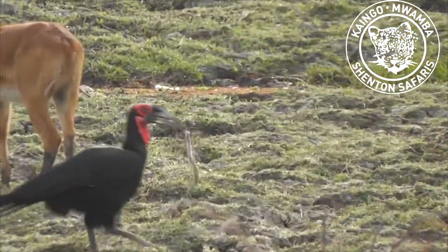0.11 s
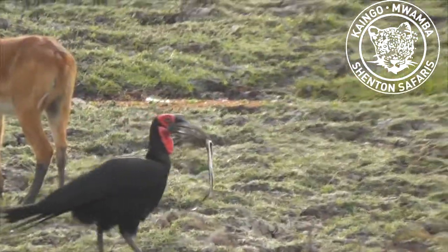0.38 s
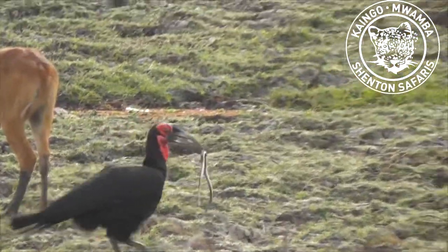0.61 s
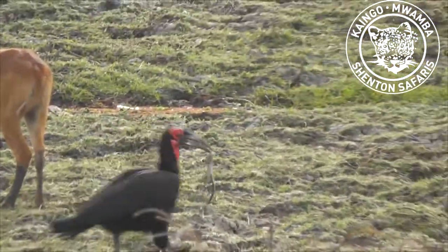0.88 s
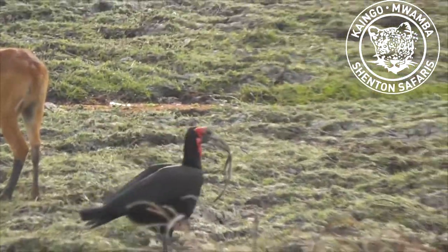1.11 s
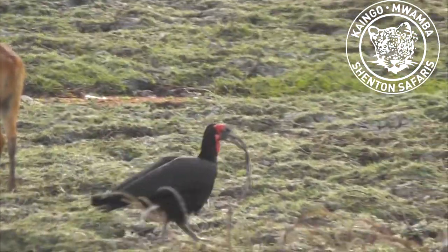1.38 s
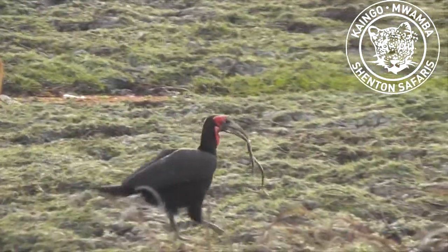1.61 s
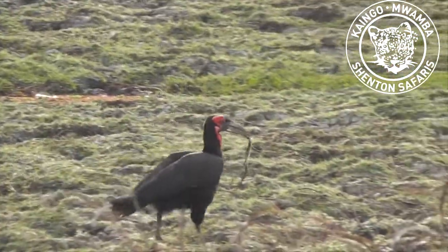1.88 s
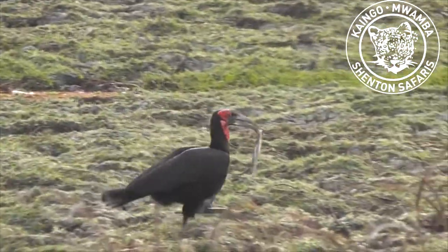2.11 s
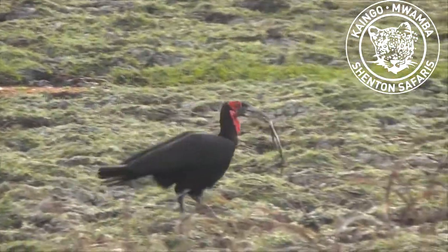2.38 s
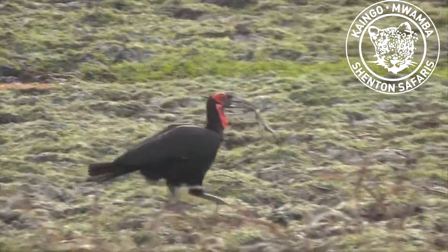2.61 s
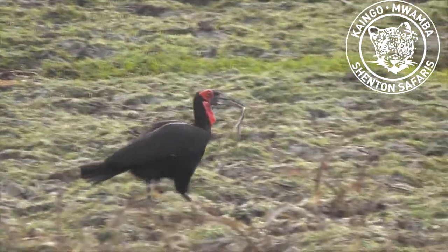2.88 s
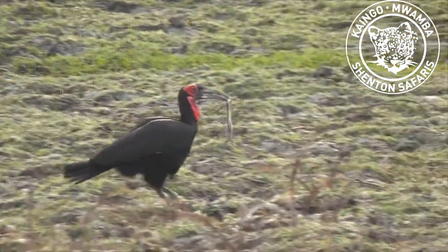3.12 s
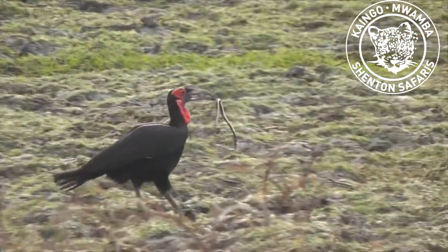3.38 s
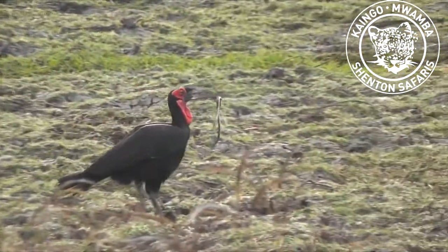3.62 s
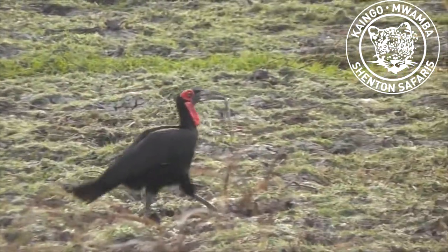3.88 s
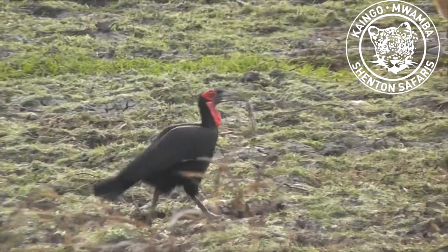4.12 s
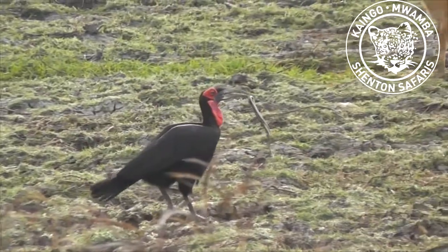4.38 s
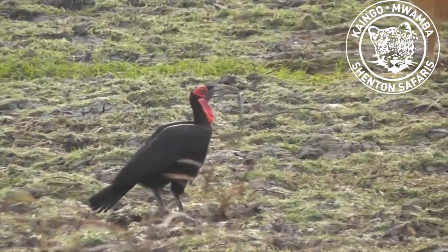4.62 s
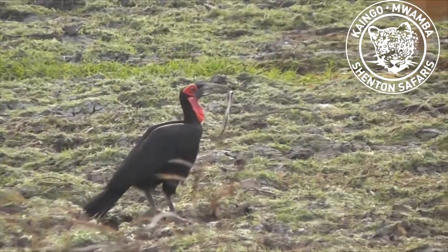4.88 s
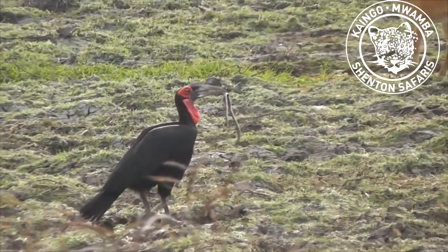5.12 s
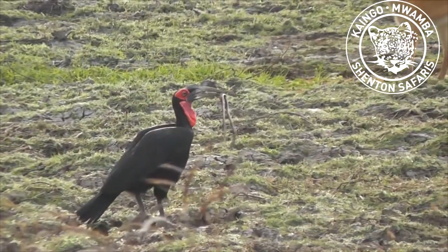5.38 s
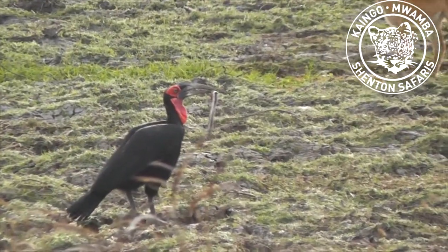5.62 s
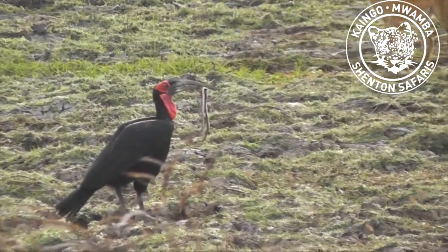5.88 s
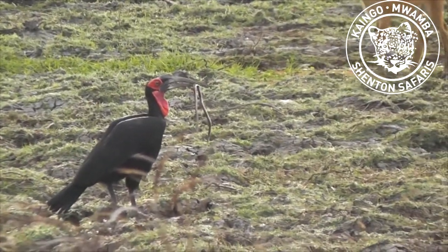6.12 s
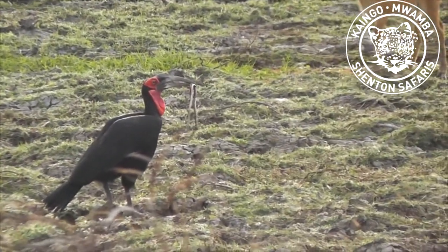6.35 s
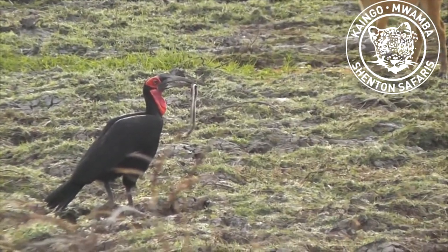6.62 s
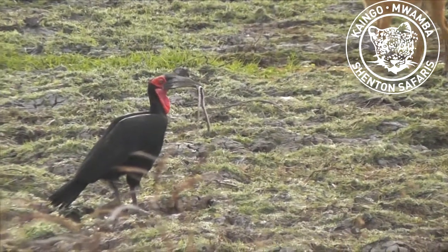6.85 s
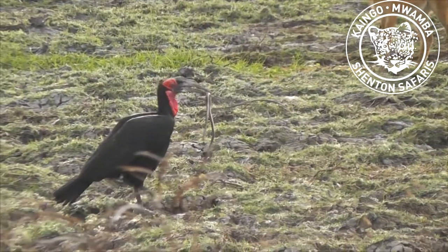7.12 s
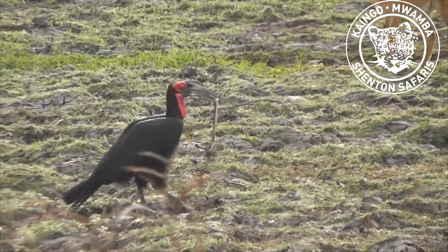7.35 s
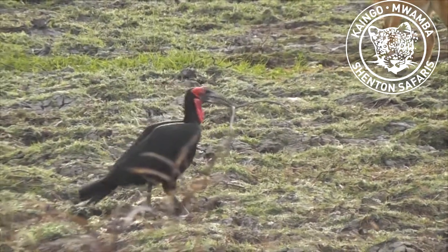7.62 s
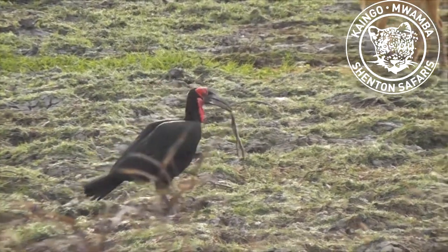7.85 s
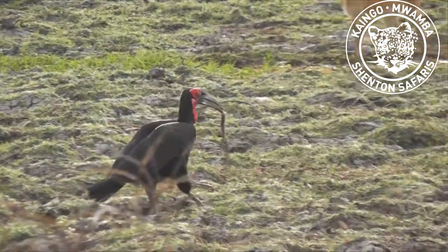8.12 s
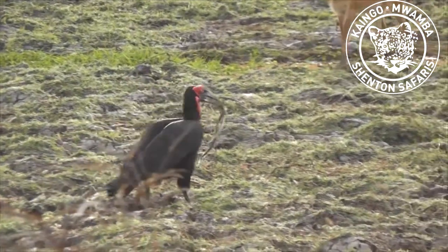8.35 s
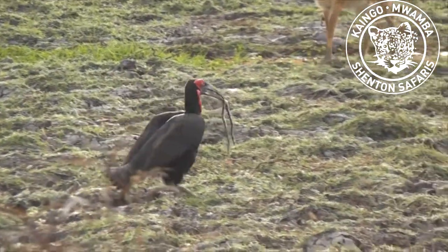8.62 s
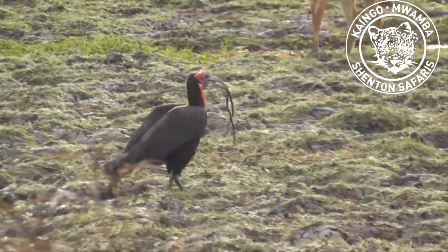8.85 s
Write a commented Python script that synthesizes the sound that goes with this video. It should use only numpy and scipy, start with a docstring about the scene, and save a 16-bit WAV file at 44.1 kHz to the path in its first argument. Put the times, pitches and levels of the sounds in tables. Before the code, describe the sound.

Outdoors in open grassland, wind buffets a small camera's microphones with low thumps and rumble for about three seconds, then nearly stops. A dove repeats short coos and rolling trills throughout, small birds whistle and a distant flock twitters. Insects buzz thinly up high, the lens motor ticks faintly early on, and a few small clicks and dull handling knocks follow. The large walking bird itself is not heard.

```python
"""Gusts of wind thump and rumble on a small camera's pair of microphone ports in open grassland, then die
down. They are shaped noise and bell-shaped bursts. A dove coos and trills and small birds whistle, as
sines on gliding pitches; a far flock is a crowd of short slides. Insects buzz near 6 kHz, as chopped
noise, and a cricket strokes. The camera's motor ticks through ringing modes and hums in faint tones;
knocks and one creak come from its body. Far air and microphone hiss lie beneath."""
import sys
import numpy as np
from scipy import signal
from scipy.fft import rfft, irfft
from scipy.io import wavfile
from scipy.ndimage import uniform_filter1d

SR = 44100
rng = np.random.default_rng(int(sys.argv[2]) if len(sys.argv) > 2 else 0)


def invert_db(level):
    """Linear amplitude ratio for a level in decibels (20 dB per decade), elementwise."""
    return 10 ** (np.asarray(level, dtype=float) / 20)


def pcm_store(signal):
    """Save signal as 16-bit PCM."""
    levels = np.round(np.clip(np.atleast_2d(signal), -1, 1) * 32767)
    wavfile.write(sys.argv[1], SR, levels.astype(np.int16).T)


N = 396459
T = np.arange(N) / SR


def rms_one(x):
    """Normalisation: scales to a root mean square of 1."""
    return x / np.sqrt(np.mean(x ** 2) + 1e-20)


def in_time(rows):
    """Linear interpolation of every column over the time in the first."""
    s, *columns = np.transpose(rows)
    return [np.interp(T, s, column) for column in columns]


def at_hz(points, hz):
    """Interpolation along a logarithmic frequency axis."""
    points = np.array(points)
    return np.interp(np.log(hz), np.log(points[:, 0]), points[:, 1])


def drift(rate_hz):
    """Low-pass random process: noise through two equal poles, with spread 1."""
    pole = np.exp(-80 * np.pi * rate_hz / SR)      # computed at every 40th sample
    noise = rng.standard_normal(N // 40 + 2002)
    slow = signal.lfilter([1], [1, -2 * pole, pole * pole], noise)[2000:]
    return np.interp(np.arange(N) / 40, np.arange(len(slow)), rms_one(slow))


def band(x, low_hz, high_hz):
    """Band-pass filtering."""
    return signal.sosfilt(signal.butter(2, [low_hz, high_hz], "band", fs=SR, output="sos"), x)


def coloured(spectrum, likeness):
    """Partial coherence: noise of one colour, whose right port gets a phase-turned share of the left."""
    hz = np.maximum(np.fft.rfftfreq(N, 1 / SR), 1)
    left, own = rfft(rng.standard_normal((2, N))) * invert_db(at_hz(spectrum, hz))
    alike = np.clip(at_hz(likeness, hz), 0, 1)
    turn = np.exp(-2j * np.pi * at_hz(np.array(likeness)[:, ::2], hz))
    right = alike * turn * left + np.sqrt(1 - alike ** 2) * own
    return rms_one(irfft([left, right], N))


def spells(rows, rise_db_per_s, fall_db_per_s):
    """Exponential growth and decay, straight lines in dB about a hold; the loudest spell wins."""
    levels = []
    for s, hold, db in rows:
        rise = rise_db_per_s * np.maximum(s - T, 0)
        fall = fall_db_per_s * np.maximum(T - s - hold, 0)
        levels.append(db - rise - fall)
    return np.max(levels, axis=0)


def add(out, start_s, sound):
    """Superposition: mixes a short sound in, cut at the end."""
    i = max(int(start_s * SR), 0)
    room = out.shape[-1] - i
    out[..., i:i + sound.shape[-1]] += sound[..., :room]


def sweep(hz, level):
    """Frequency modulation: a sine whose phase sums up its pitch track."""
    return level * np.sin(2 * np.pi * np.cumsum(hz) / SR)


def placed(x, pan_db, lag_s):
    """Interaural cues: a level difference, left over right, and a delay of the right port."""
    return np.array([x * invert_db(pan_db / 2), np.interp(T - lag_s, T, x) * invert_db(-pan_db / 2)])


def echoes(x):
    """Early reflections: a few weak returns from ground and bushes."""
    out = x.copy()
    for lag_s, db in [(.009, -11.5), (.023, -11.5), (.047, -15)]:
        out += invert_db(db) * np.interp(T - lag_s, T, x)
    return out


def ring(kicks, hz, t60):
    """Damped resonance: a unit kick sets a sine of height 1 ringing, 60 dB down after t60 seconds."""
    r, w = invert_db(-60 / (t60 * SR)), 2 * np.pi * hz / SR
    return signal.lfilter([0, np.sin(w)], [1, -2 * r * np.cos(w), r * r], kicks + 1e-18)


# colour of the low rumble: f/Hz, relative level/dB per Hz
GUST_SPECTRUM = [(15, -38), (25, -1), (87, 6.5), (141, -0.5), (243, -9), (321, -27), (400, -57), (520, -56),
                 (880, -120)]
# gusts on the ports: start t/s, hold/s, control level/dB
GUSTS = [(0, 0.086, -41.5), (.33, .04, -35), (.4, 0.05, -24), (.47, 0.076, -30.5), (.62, 0.21, -37),
         (.9, 0.16, -35), (1.15, .17, -35.5), (1.62, .07, -39.5), (1.74, 0.051, -27), (1.85, 0.15, -35),
         (2.22, 0.035, -40), (2.43, 0.14, -44.5), (2.68, 0.21, -36.5), (3.1, 0.09, -52.5),
         (4.11, 0.031, -51.5), (4.33, 0.243, -60.5), (6.28, 0.076, -56), (6.4, 0.057, -53),
         (6.93, 0.024, -55), (7.08, .04, -58), (7.18, 0.092, -53.5), (8.325, 0.022, -57), (8.56, .04, -66)]
# light air between gusts: t/s, control level/dB
BREEZE = [(0, -52.5), (2.6, -48), (3.3, -70), (4.7, -73), (6.1, -69), (6.6, -75), (7.4, -80), (8.2, -71),
          (9, -78)]


def wind():
    """Turbulent pressure noise: lumpy, partly shared by the ports; stronger eddies reach higher."""
    gust_db = np.maximum(spells(GUSTS, rise_db_per_s=190, fall_db_per_s=232), in_time(BREEZE)[0])
    quieting_db = 0.46 * np.minimum(gust_db + 61.0, 0)      # light air falls silent quickly
    rumble_db = gust_db + quieting_db + 3.7 * drift(16.7)
    # likeness of the ports: f/Hz, coherence 0-1, left lead/turns
    low = coloured(GUST_SPECTRUM, [(61, 0.9, -0.12), (130, 0.66, 0.12), (200, 0.74, -0.12), (304, 0.86, -0.39)])
    low = low * invert_db(2.04 * np.array([drift(22), drift(19.4)]))
    flat = coloured([(20, 0), (900, 0)], [(240, 0.26, -0.35), (400, 1.0, -0.36)])
    upper = rms_one(band(flat, 202, 395)) * invert_db(np.array([[1.5], [-1.5]]))      # 3 dB stronger at the left
    deep = signal.lfilter(*signal.butter(1, 90, fs=SR), low)
    out = invert_db(rumble_db - 1.0) * (low - deep)
    out = out + invert_db(.75 * rumble_db - 12.5) * deep      # grows less with the gust
    return out + invert_db(1.48 * rumble_db - 5.5) * upper      # grows more with the gust


# colour of far air and microphone hiss: f/Hz, relative level/dB per Hz
FIELD_SPECTRUM = [(18, -35), (45, -9), (90, 1), (170, 5.5), (480, -1.5), (830, -3.5), (1080, -5.5),
                  (1360, -8), (2980, -15.5), (3680, -15.5), (5300, -17), (6200, -15), (8710, -23.5),
                  (13900, -31.5), (15500, -37.5)]
# slow swell of the far air: t/s, level change/dB
SWELL = [(0, 2.5), (1.5, 3.5), (3, 1), (4.5, 3), (5.5, 2), (6.2, 3.5), (7, 4), (7.6, 4.5), (8.2, 3.5),
         (9, 2.5)]
# how the ports share the far air: f/Hz, coherence 0-1, left lead/turns
FIELD_LIKENESS = [(60, 1, 0.89), (150, 0.72, 0.41), (332, 0.38, 0.57), (610, 0.34, 0.42), (950, 0.17, 0.33),
                  (1426, 1, 0.3), (2920, 0.82, 0), (7300, 0.87, 0), (10000, 1, 0.2), (15000, 0.5, 0.01)]


def far_air():
    """Stationary background noise, partly coherent, whose level swells slowly."""
    level_db = -62.5 + in_time(SWELL)[0] + .5 * drift(20)
    return invert_db(level_db) * coloured(FIELD_SPECTRUM, FIELD_LIKENESS)


# camera tones: mean f/Hz, mean level/dB
HUM = [(60.5, -74), (121, -74.5), (839.8, -75), (1259, -78.5), (2516, -88.5)]
# lens motor steps, the even ones much weaker for a while: t/s, mean kick level/dB of odd steps, of even steps
STEPS = [(0, -58, -59), (.45, -58, -62), (.6, -56, -73), (1.19, -52.5, -77), (1.25, -57, -58),
         (1.7, -56.5, -58), (2.25, -60, -61), (2.6, -57, -63)]
# casing modes: f/Hz, relative level/dB, t60/s
CASING = [(1600, -15, .008), (1950, -9, .012), (2350, 0, .014), (3600, -16, .005), (5000, -2, .012)]
# clicks on the casing: t/s, relative level/dB
CLICKS = [(1.2355, -53), (4.4771, -44), (4.597, -54.5)]
# a brush of cloth: start t/s, length/s, level/dB of the noise before its filter
RUSTLE = (1.236, .028, -63)


def camera():
    """Modal excitation: motor steps and clicks ring the same casing; faint tones waver under them."""
    steps = np.arange(1, 158)
    jitter_s = .00012 * rng.standard_normal(len(steps))
    at = ((.0003 + steps / 59.94 + jitter_s) * SR).astype(int)      # 59.94 steps per s
    odd_db, even_db = in_time(STEPS)
    step_db = np.where(steps % 2, odd_db[at], even_db[at]) + 1.2 * rng.standard_normal(len(at))
    kicks, snaps = np.zeros(N), np.zeros(N)
    kicks[at] = invert_db(step_db)
    for s, db in CLICKS:
        snaps[round(s * SR)] = invert_db(db + 4)
    out = sum(sweep(hz * (1 + 0.003 * drift(8.0)), np.sqrt(2) * invert_db(db + drift(2))) for hz, db in HUM)
    out = out + sum(invert_db(db) * ring(kicks + 0.073 * snaps, hz, t60) for hz, db, t60 in CASING)
    s, length, db = RUSTLE
    brush = rng.standard_normal(N) * (T > s) * (T < s + length)
    direct_clicks = 11.0 * band(band(snaps, 1200, 4800), 1200, 4800)
    return out + invert_db(db) * band(brush, 900, 15000) + direct_clicks


# bird notes that slide: start t/s, length/s, from f/Hz, to f/Hz, level/dB
SLIDES = [(0, .08, 2900, 3050, -72.5), (0.304, 0.052, 2880, 2990, -71), (0.456, .04, 2050, 2260, -68),
          (.51, .04, 3560, 3300, -75), (0.568, .08, 3570, 3930, -75), (0.718, .085, 3130, 2740, -71.5),
          (.81, .06, 2800, 2750, -76), (0.832, .07, 3330, 3160, -77), (0.953, 0.045, 3650, 3250, -71),
          (1.26, 0.045, 2880, 3140, -73), (1.361, 0.14, 3560, 3580, -68.5),
          (1.896, .075, 2900, 2900, -70.5), (1.962, .055, 2900, 2500, -74), (2.24, .03, 3560, 3900, -73),
          (2.27, 0.034, 3950, 3500, -74), (7.995, 0.018, 3800, 5040, -70), (2.818, 0.097, 2950, 3350, -76),
          (2.934, .09, 3300, 3620, -69.5), (3.128, .05, 2500, 2050, -74), (3.351, .05, 3500, 3950, -72.5),
          (3.38, 0.064, 2260, 2200, -73), (3.536, .025, 4320, 4700, -67), (3.88, 0.052, 3650, 3800, -71),
          (3.93, .03, 4450, 4900, -71), (5.477, 0.049, 3350, 3250, -72), (5.521, .07, 1800, 2240, -68),
          (5.703, 0.057, 2050, 1740, -67), (5.805, 0.11, 1640, 1910, -64.5),
          (5.907, 0.036, 1750, 2250, -66.5), (5.911, .045, 3900, 4250, -69), (5.962, .025, 4000, 4650, -71),
          (5.35, .05, 3730, 3420, -73), (5.552, .04, 4220, 4350, -72), (5.498, .03, 1900, 1760, -68),
          (5.956, 0.037, 1900, 2200, -69), (6.298, 0.093, 1770, 2000, -66.5),
          (6.38, 0.045, 1780, 2150, -66), (6.499, .09, 3300, 3550, -75), (6.91, .045, 1830, 2180, -66.5),
          (6.992, 0.049, 2270, 2150, -69), (7.027, 0.086, 1200, 1260, -65.5), (7.05, .04, 2250, 2100, -69),
          (7.42, .04, 3400, 3460, -71), (7.524, 0.064, 1800, 2220, -66), (7.678, .06, 2200, 1780, -68),
          (7.75, .04, 2550, 3150, -70), (7.788, 0.079, 3150, 3640, -67.5), (7.947, .055, 2600, 3750, -68),
          (8.01, .07, 5100, 3550, -68), (8.24, .06, 3390, 3550, -74), (8.725, .04, 3750, 3950, -71),
          (8.805, .025, 5000, 3450, -72), (8.83, .025, 3450, 4150, -70), (8.87, .022, 3600, 4500, -70),
          (8.91, .04, 3650, 3550, -73), (4.84, .05, 2950, 2980, -73)]
# bird notes that bend and return: start t/s, length/s, end f/Hz, middle f/Hz, level/dB
ARCHES = [(1.56, .08, 3190, 3530, -69), (2.879, 0.056, 3480, 3850, -69), (5.61, 0.04, 2000, 2330, -67),
          (5.997, .05, 1330, 1405, -69), (6.438, 0.056, 1946, 2510, -66), (6.944, 0.038, 1180, 1330, -61),
          (7.619, 0.037, 1950, 2400, -65), (5.935, .03, 2150, 1800, -71)]
# one hoarse cry: start t/s, length/s, from f/Hz, to f/Hz, level/dB
SQUAWK = (6.135, .045, 4700, 5500, -63)


def ease(along):
    """Smooth glide: the mean of a straight line and a half cosine."""
    return (1 - np.cos(np.pi * along)) / 4 + along / 2


def bend(along):
    """Half-sine glide: out to the middle pitch and back."""
    return np.sin(np.pi * along)


def whistles():
    """Frequency-modulated near sines with soft ends; low voices warble; one cry has a noisy amplitude."""
    out, waver = np.zeros(N), 0.012 * drift(30)
    warble_hz = 28 * (1 + 0.28 * drift(8.02))
    warble = sweep(warble_hz, .025)
    for notes, shape in [(SLIDES, ease), (ARCHES, bend)]:
        for s, length, from_hz, to_hz, db in notes:
            along = np.linspace(0, 1, int(length * SR))
            wobble = waver + warble * (max(from_hz, to_hz) < 2450)
            glide_hz = from_hz + (to_hz - from_hz) * shape(along)
            hz = glide_hz * (1 + np.interp(s + length * along, T, wobble))
            add(out, s, sweep(hz, np.sqrt(2) * invert_db(db) * signal.windows.tukey(len(along), .35)))
    s, length, from_hz, to_hz, db = SQUAWK
    hz = np.linspace(from_hz, to_hz, int(length * SR))
    hoarse = rms_one(uniform_filter1d(rng.standard_normal(len(hz)), size=60))
    add(out, s, sweep(hz, np.sqrt(2) * invert_db(db) * np.hanning(len(hz)) * hoarse))
    return placed(echoes(out), .5, .00002)


def many_slides(level_db, low_hz, span, count):
    """Statistical superposition: many short, steep, slightly hoarse slides, blurred by echoes."""
    out = np.zeros(N)
    for s, pitch, slide, length, size in rng.random((count, 5)):
        t = np.linspace(0, 1, int((0.00707 + 0.0269 * length) * SR))
        hz = low_hz * span ** pitch * (1 + 0.588 * (slide - .55) * (t - .5))
        add(out, s * N / SR, sweep(hz, invert_db(5 * size) * np.sin(np.pi * t) ** 2))
    hoarse = 1 + 0.65 * drift(120)
    return rms_one(echoes(out * hoarse)) * invert_db(level_db)


# outbursts of the distant flock: start t/s, hold/s, level/dB
FLOCK = [(0, 1.4, -74), (1.25, 0.46, -70), (1.9, 0.041, -69.5), (2.2, .4, -76.5), (2.87, 0.15, -76),
         (3.45, 0.068, -74.5), (3.69, 0.042, -72), (3.9, .35, -75), (4.46, .4, -77.5), (5.05, 0.028, -72),
         (5.33, 0.19, -70), (5.92, 0.13, -70.5), (6.28, .3, -71.5), (6.9, 0.85, -73), (7.8, .25, -75),
         (8.78, 0.09, -77)]


def flock():
    """Statistical superposition of calls above 3 kHz, whose level bursts and decays to a floor."""
    level_db = np.maximum(spells(FLOCK, rise_db_per_s=133, fall_db_per_s=133), -81)
    return many_slides(level_db, 3100, 1.55, count=2400)


# far warbling blurred to a haze near 2 kHz: t/s, level/dB
HAZE = [(0, -76), (4.4, -90), (5.2, -76), (5.8, -77), (6.2, -67.5), (6.75, -75), (6.95, -71), (7.62, -67.5),
        (7.9, -78), (8.4, -70), (9, -100)]


def haze():
    """Statistical superposition of lower calls, too dense to tell apart."""
    return placed(many_slides(in_time(HAZE)[0], 1250, 2.1, count=2500), 1.4, .00006)


def chopped_noise(hz, level_db, width_hz, strokes_per_s):
    """Amplitude modulation: wing strokes chop narrow-band noise carried on a given pitch."""
    rate = strokes_per_s * (1 + 0.0827 * drift(3.92))
    strokes = 1 + sweep(rate, 0.66)
    low_pass = signal.butter(2, width_hz, fs=SR, output="sos")
    a, b = signal.sosfilt(low_pass, rng.standard_normal((2, N)))
    turn = 2 * np.pi * np.cumsum(hz) / SR
    return invert_db(level_db) * rms_one(strokes * (a * np.cos(turn) + b * np.sin(turn)))


# insect chorus: t/s, mean level/dB
CHORUS = [(0, -77.5), (1.1, -74), (1.8, -75), (4.5, -74), (5.5, -75.5), (7, -73), (9, -76.5)]
# near singers that stand out of the chorus: start t/s, mean level/dB
CHIRRS = [(.07, -71), (1.02, -69), (1.48, -69), (1.67, -74), (2.08, -68.5), (2.32, -70), (2.63, -70.5),
          (2.86, -68), (3.45, -67.5), (4.47, -68), (4.81, -67.5), (6.35, -67), (6.81, -68), (6.95, -70),
          (7.49, -70), (8.26, -68)]


def insect_chorus():
    """Amplitude-modulated noise on a wandering pitch near 6 kHz; singers come and go."""
    chirrs = [(s, 0.022, db) for s, db in CHIRRS]      # each holds 22 ms
    chorus_db = in_time(CHORUS)[0] + 2.1 * drift(16)
    level_db = np.maximum(chorus_db, spells(chirrs, 200, 200)) + 2.0 * drift(26)
    return chopped_noise(6080 + 200 * drift(8.7), level_db, width_hz=300, strokes_per_s=100)


# dove, plain coos: start t/s, length/s, top f/Hz, level/dB
COOS = [(0.088, 0.11, 946, -60.5), (0.885, 0.034, 850, -55.5), (1.249, 0.094, 950, -60.5),
        (1.38, 0.07, 930, -64), (2.093, 0.047, 876, -58), (2.484, 0.088, 946, -62),
        (3.576, 0.097, 950, -62), (4.378, 0.031, 840, -59), (4.742, 0.08, 956, -64),
        (5.547, 0.029, 838, -60), (5.915, 0.1046, 945, -59.5), (6.773, 0.028, 844, -61),
        (7.149, 0.084, 950, -56), (7.983, 0.035, 845, -58), (8.356, 0.092, 950, -57.5),
        (8.526, 0.051, 946, -61)]
# dove, rolled notes: start t/s, length/s, nominal f/Hz, relative level/dB, pulses per s
ROLLS = [(0.457, 0.37, 906, -60.5, 33), (1.617, 0.37, 911, -61, 34.5), (2.848, 0.39, 925, -62, 31.4),
         (3.949, 0.35, 913, -62, 32.4), (5.108, 0.35, 924, -62, 27), (6.296, .39, 921, -58.5, 33),
         (7.535, .385, 921, -56.5, 32), (8.742, 0.44, 906, -57, 33), (3.289, .27, 888, -70.5, 35),
         (4.599, .43, 927, -66.5, 33)]
# far doves blurred together: t/s, mean level/dB
FAR_DOVES = [(0, -71), (3, -69), (6, -69), (7.7, -66), (8.1, -70), (9, -69)]


def dove():
    """Frequency modulation: notes arch up and sag; rolled ones are trains of quick falling pulses."""
    out = np.zeros(N)
    for s, length, hz, db in COOS:
        along = np.linspace(0, 1, int(length * SR))
        fullness = min(length / 0.072, 1) ** 2      # coos under 72 ms arch less
        arch = np.interp(along, [0, .2, .6, 1], [.91, 1, .94, .82]) ** fullness
        add(out, s, sweep(hz * arch, np.sqrt(2) * invert_db(db) * signal.windows.tukey(len(along), .4)))
    for s, length, hz, db, per_s in ROLLS:
        t = np.arange(0, length, 1 / SR)
        cycle, along = (t * per_s) % 1, t / length
        arch = np.interp(along, [0, .15, .55, .8, 1], [.94, .96, 1.01, .98, .89])
        pulse = np.sin(np.pi * np.minimum(cycle / .85, 1)) ** 1.1
        swell = np.interp(along, [0, .03, .15, .3, .8, .97, 1], [0.074, 1.4, 1.37, 1.14, 1.8, 2.14, 1.3])
        add(out, s, invert_db(db) * sweep(hz * arch * (1.11 - .25 * cycle), pulse * swell))
    far = rms_one(band(rng.standard_normal(N), 740, 950))
    far = far * invert_db(in_time(FAR_DOVES)[0] + 1.5 * drift(15))
    return placed(echoes(out), 4.3, 0.00012) + placed(far, -1.7, 0.0001)


# thumps of single eddies: t/s at the top, relative level/dB, f/Hz, nominal length/ms, left over right/dB
THUMPS = [(0.006, -27.5, 111, 8.6, -4), (0.079, -28, 130, 18, 0), (0.296, -30, 119, 12, 7),
          (0.343, -23.5, 121, 8.3, 3), (0.371, -24.5, 181, 17.3, 8.5), (0.425, -13, 171, 5.8, 4.5),
          (0.486, -24, 120, 6, -10), (0.518, -27, 159, 6.4, -7), (0.56, -20, 127, 9, -1),
          (0.681, -26, 118, 12, -2), (0.74, -17, 130, 9.7, 0), (0.788, -23, 134, 11.3, 0),
          (0.916, -24, 130, 14, -6), (0.96, -32.5, 181, 14.3, 1), (1.045, -29, 150, 6.7, 5),
          (1.169, -31, 150, 14.5, -4), (1.3, -28, 130, 23, 0), (1.64, -27, 134, 10.4, 1),
          (1.705, -21.5, 154, 9.1, 3), (1.795, -27.5, 132, 30, -2), (1.874, -29, 108, 12, 3),
          (1.9, -18.5, 171, 5.4, 2), (1.974, -26, 114, 26, -0.5), (2.003, -28.5, 150, 8.2, -6),
          (2.226, -30, 130, 7.9, 0), (2.259, -29.5, 119, 27, 0), (2.384, -32.5, 99, 13, -3),
          (2.475, -30.5, 119, 28, 0), (2.727, -25.5, 139, 12, -1), (2.773, -26, 119, 11, 2),
          (2.799, -28.5, 120, 9.6, 5), (2.895, -26, 130, 9.2, -3), (3.111, -43, 99, 9.2, 0),
          (4.156, -32.5, 118.3, 9.2, 1), (6.337, -50, 120, 11, -6), (6.418, -44, 137, 9.9, -1),
          (6.958, -42.5, 105, 23, -3), (7.149, -42.5, 109, 5.3, -1), (7.198, -42, 230, 6, -2),
          (7.249, -42, 265, 6, 0)]


def thumps():
    """Pressure transients: each eddy is a brief wave under a Gaussian bell, its phase differing by port."""
    out, turn = np.zeros((2, N)), rng.random((len(THUMPS), 2))
    for (s, db, hz, ms, pan_db), (phase, skew) in zip(THUMPS, turn):
        width = max(ms, 6.0) * 0.00044      # seconds
        t = np.arange(-3 * width, 3 * width, 1 / SR)
        angle = 2 * np.pi * (hz * t + phase) + 2.06 * (skew - .5) * np.array([[1], [-1]])
        shape = np.cos(angle) + 0.16 * np.cos(2 * angle)      # steep fronts add an overtone
        height = invert_db(db + 2.0 + pan_db * np.array([[.5], [-.5]]))
        add(out, s - 3 * width, height * np.exp(-(t / width) ** 2) * shape)
    return out


# strength of each buzz of a higher insect, in turn: level/dB
BUZZER = [-79, -70, -88, -83, -81, -79, -77, -71.5, -88, -76, -88]


def high_buzzer():
    """Amplitude-modulated noise at a steady 6950 Hz, in buzzes at an even pace."""
    buzzes = [(0.16 + .81 * k, 0.12, db) for k, db in enumerate(BUZZER)]      # start s, hold s, dB
    return chopped_noise(6950 + 0 * T, spells(buzzes, 147, 147), width_hz=150, strokes_per_s=88)


# dull knocks on the body: t/s, relative level/dB
KNOCKS = [(0.355, -44), (0.423, -37), (0.503, -41), (0.55, -33), (1.759, -35), (1.894, -40), (4.443, -42.5),
          (4.453, -40), (4.478, -44), (4.499, -46.5), (4.664, -53), (5.419, -50.5), (7.249, -48),
          (7.682, -47), (8.331, -42), (8.365, -51.5), (8.553, -50.5)]
# body modes: f/Hz, relative level/dB, t60/s
BODY = [(230, -1, 0.048), (373, 7, 0.013), (530, -10, 0.02)]


def knocks():
    """Modal excitation: each knock strikes every mode of the body with a strength of its own."""
    out, at = np.zeros((2, N)), [round(s * SR) for s, db in KNOCKS]
    for hz, db, t60 in BODY:
        kicks = np.zeros((2, N))
        scatter_db = 2.0 * rng.standard_normal((len(at), 2)).T
        kicks[:, at] = invert_db(np.array(KNOCKS)[:, 1] + db - 12 + scatter_db)
        out += ring(band(2.9 * kicks, 226, 730), hz, t60)      # a soft contact
    return out


# cricket phrases: start t/s, strokes (whole part counts), relative level/dB of the first stroke
CRICKET = [(6.42, 4, -70), (6.90, 4, -73), (7.36, 6, -77), (7.85, 4, -76), (8.30, 5.5, -70.5),
           (8.79, 4, -75)]


def cricket():
    """Stridulation: trains of short falling tones, each a little louder than the last."""
    out, t = np.zeros(N), np.linspace(0, 1, int(0.015 * SR))
    stroke = sweep(8100 - 1000 * t, np.sin(np.pi * t))
    for s, strokes, db in CRICKET:
        for k in range(int(strokes)):
            add(out, s + .0315 * k, invert_db(db + .8 * k) * stroke)
    return out


# a short creak of the mount: start t/s, length/s, from f/Hz, to f/Hz, relative level/dB
CREAK = (7.038, .066, 218, 240, -39)


def creak():
    """Harmonic series: four partials glide up together under one uneven envelope."""
    out = np.zeros(N)
    s, length, from_hz, to_hz, db = CREAK
    hz = np.linspace(from_hz, to_hz, int(length * SR))
    tone = sum(sweep(k * hz, invert_db(partial_db)) for k, partial_db in enumerate([0, -14, -24, -24], 1))
    envelope = np.interp(hz, np.linspace(from_hz, to_hz, 6), [0, 1, 1, .35, .5, 0])
    add(out, s, invert_db(db) * tone * envelope)
    return out


def scene():
    """Superposition: all sources sum at the two ports."""
    animals = whistles() + flock() + haze() + insect_chorus() + dove() + high_buzzer() + cricket()
    return wind() + far_air() + camera() + animals + thumps() + knocks() + creak()


def band_limit(x):
    """A steep low-pass at the top of the band."""
    return signal.sosfilt(signal.butter(12, 15620, fs=SR, output="sos"), x)


def record(dry):
    """High-pass response: the microphones lose the deepest bass."""
    thin = signal.sosfilt(signal.butter(2, 68, "high", fs=SR, output="sos"), dry)
    return band_limit(thin)


dry = scene()
out = record(dry)
pcm_store(out)
```